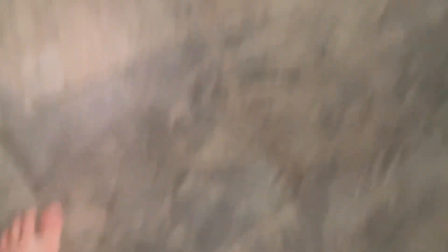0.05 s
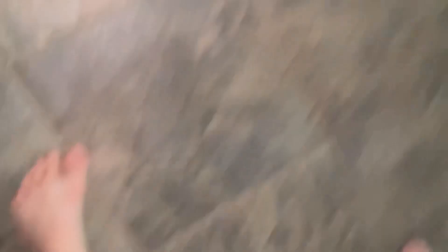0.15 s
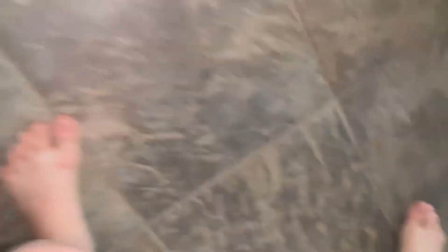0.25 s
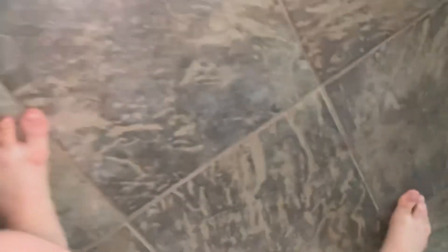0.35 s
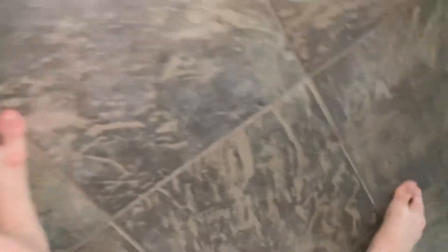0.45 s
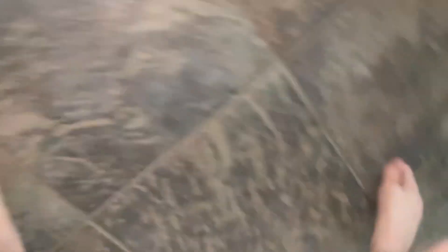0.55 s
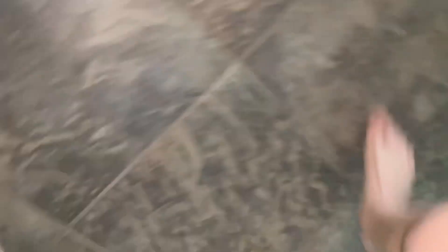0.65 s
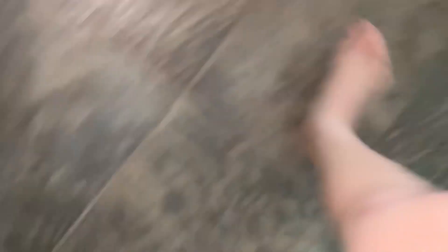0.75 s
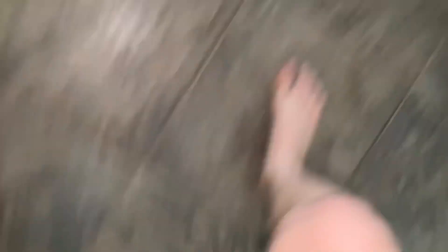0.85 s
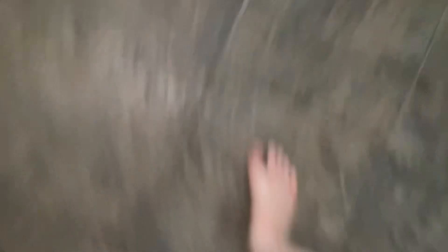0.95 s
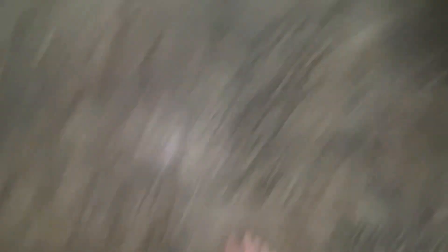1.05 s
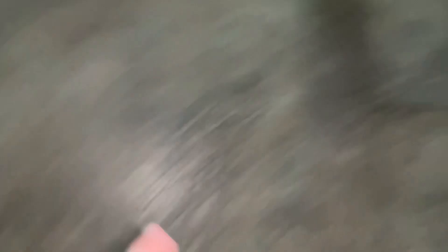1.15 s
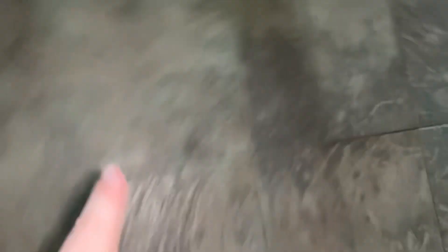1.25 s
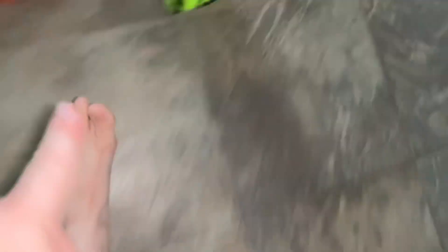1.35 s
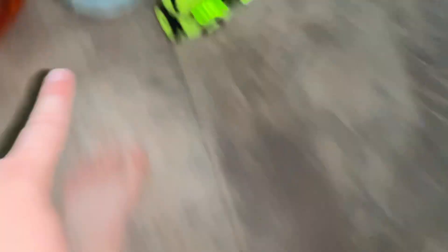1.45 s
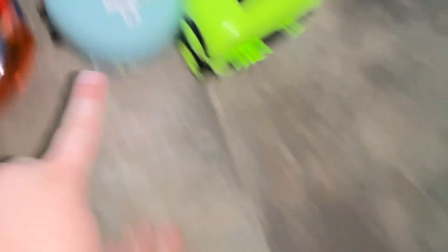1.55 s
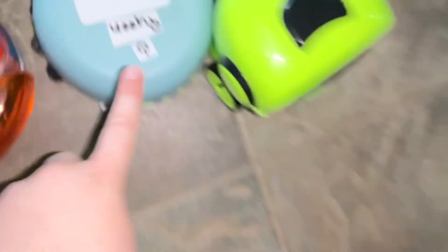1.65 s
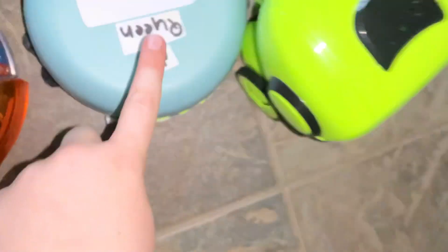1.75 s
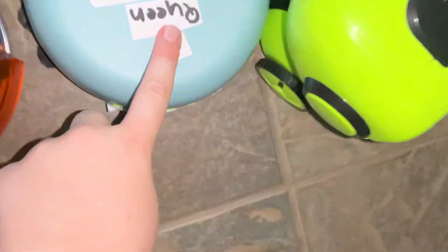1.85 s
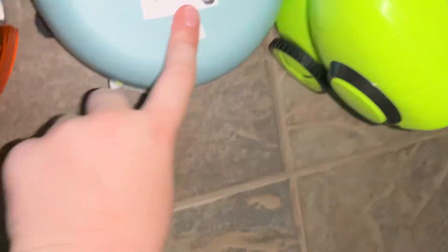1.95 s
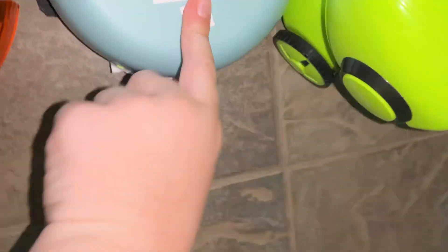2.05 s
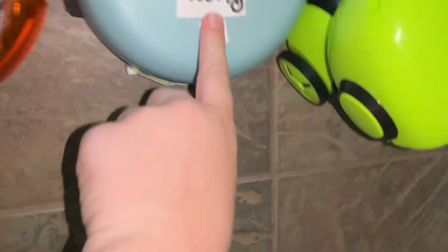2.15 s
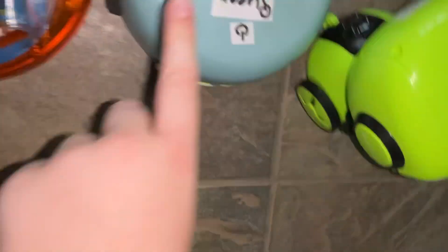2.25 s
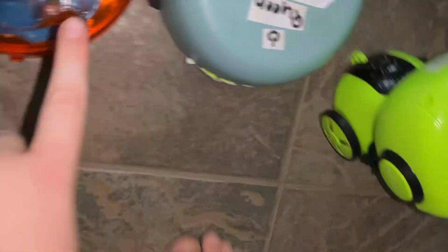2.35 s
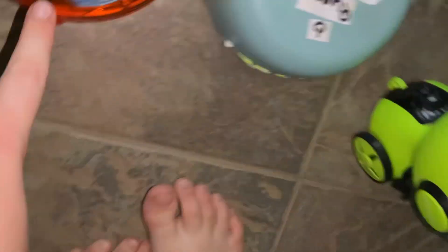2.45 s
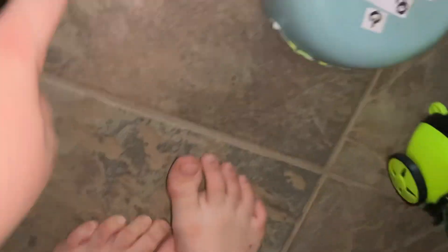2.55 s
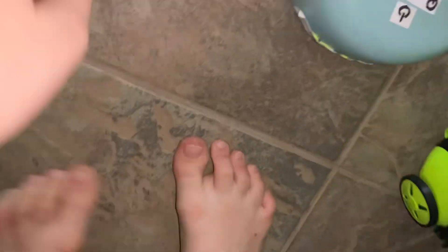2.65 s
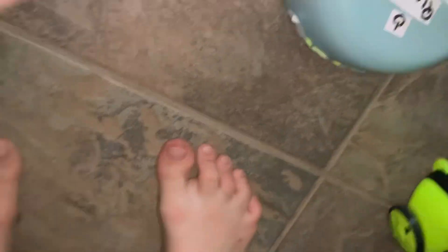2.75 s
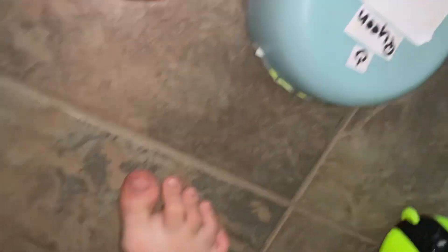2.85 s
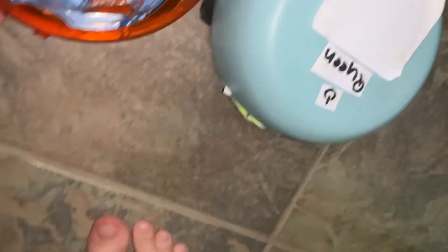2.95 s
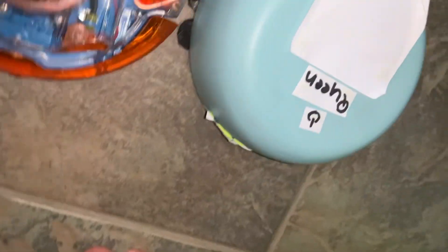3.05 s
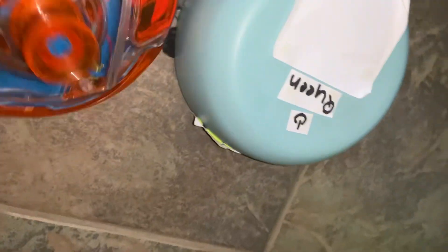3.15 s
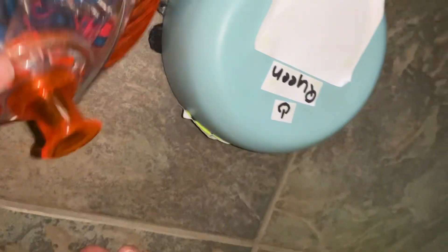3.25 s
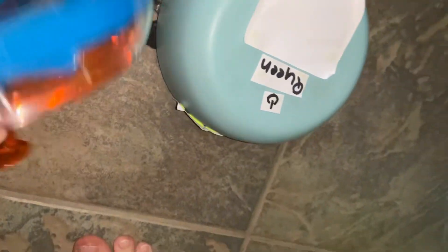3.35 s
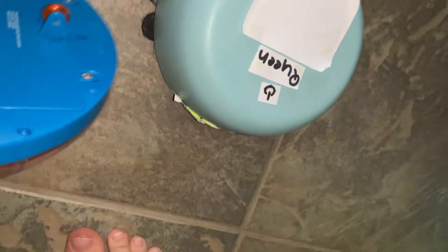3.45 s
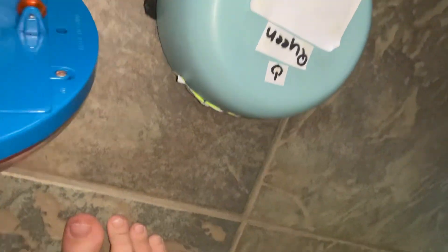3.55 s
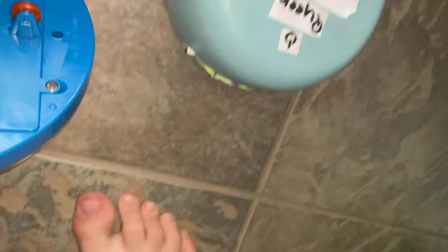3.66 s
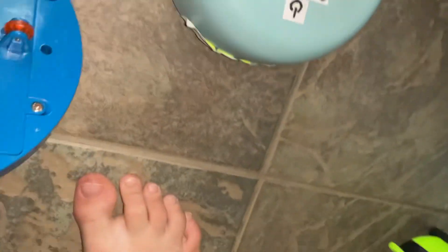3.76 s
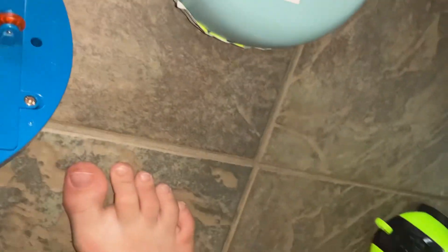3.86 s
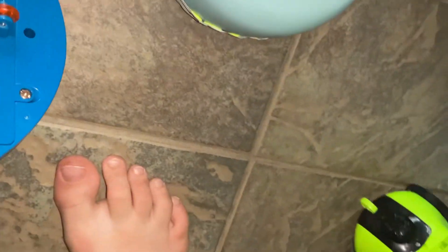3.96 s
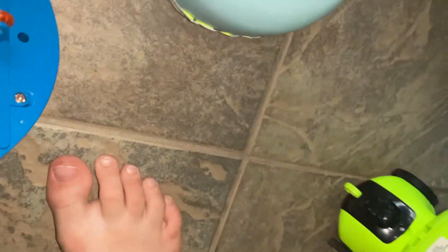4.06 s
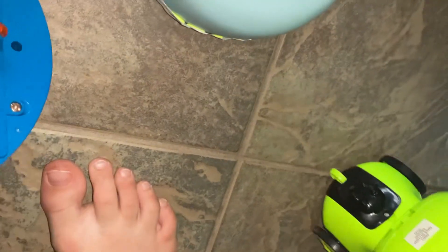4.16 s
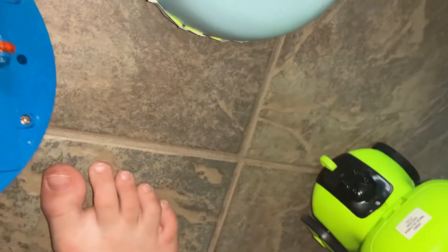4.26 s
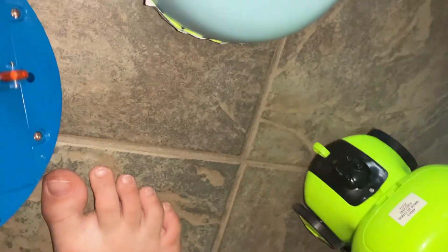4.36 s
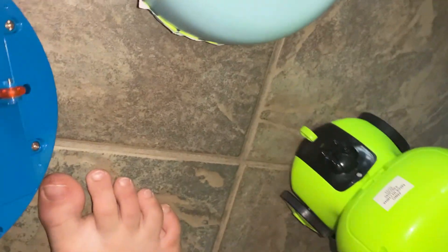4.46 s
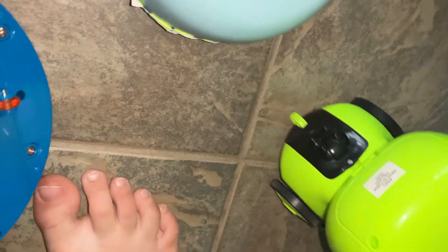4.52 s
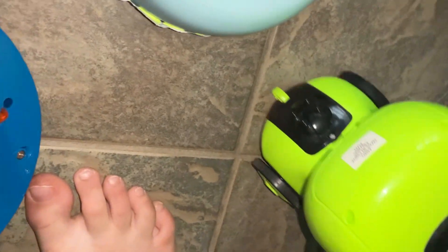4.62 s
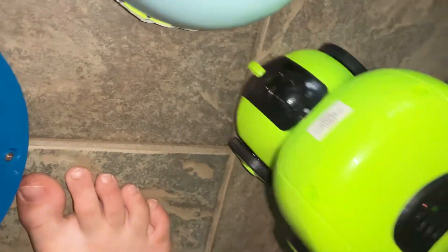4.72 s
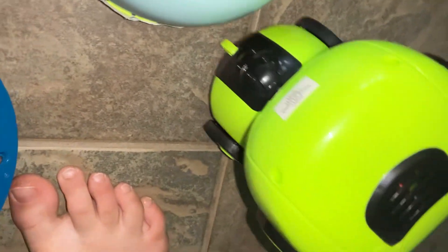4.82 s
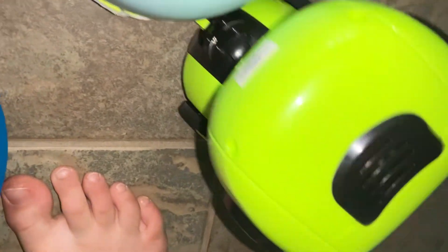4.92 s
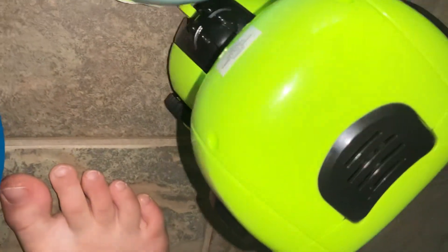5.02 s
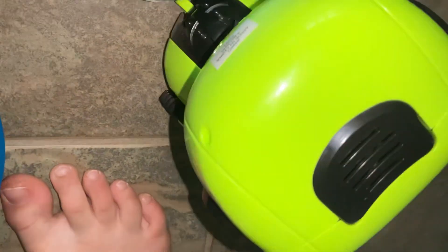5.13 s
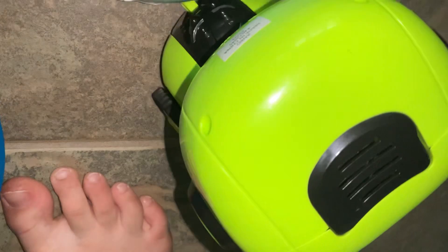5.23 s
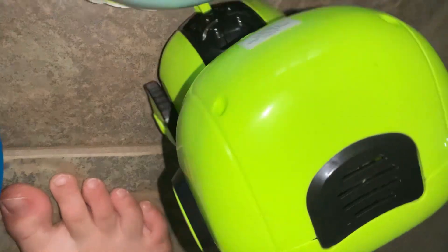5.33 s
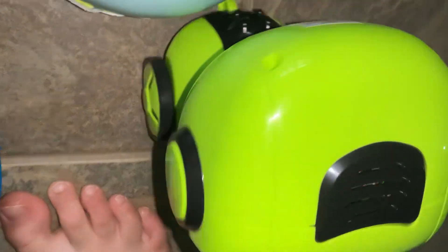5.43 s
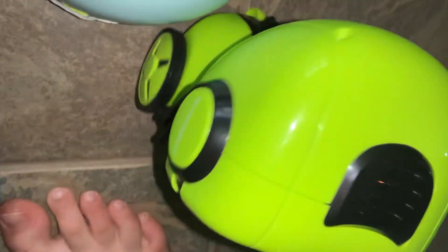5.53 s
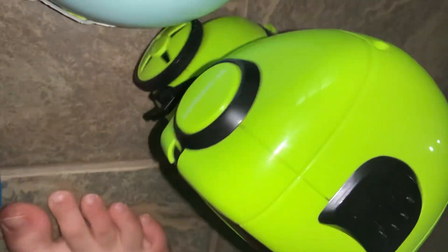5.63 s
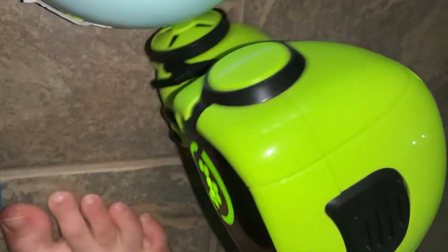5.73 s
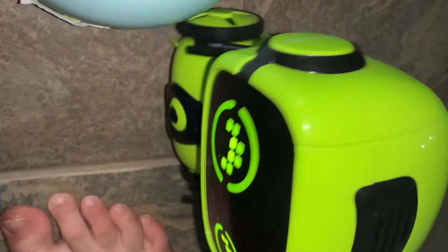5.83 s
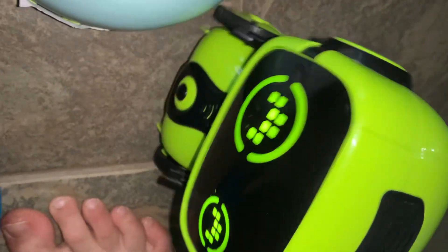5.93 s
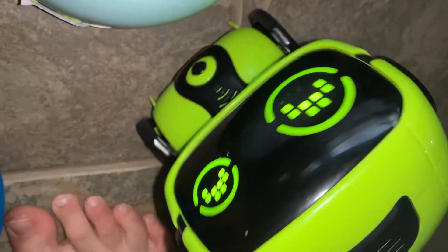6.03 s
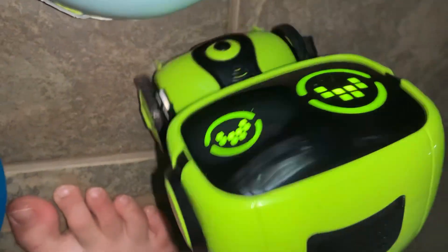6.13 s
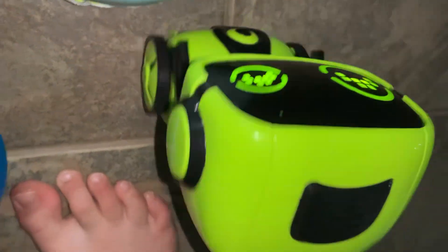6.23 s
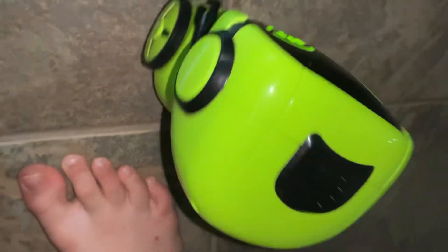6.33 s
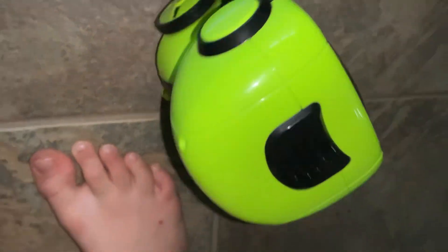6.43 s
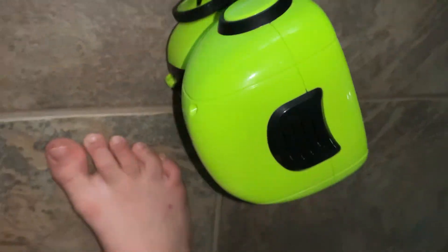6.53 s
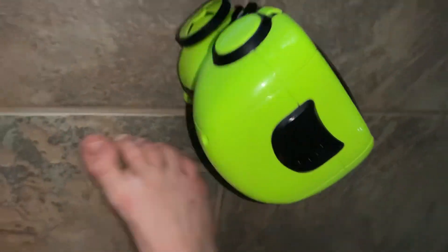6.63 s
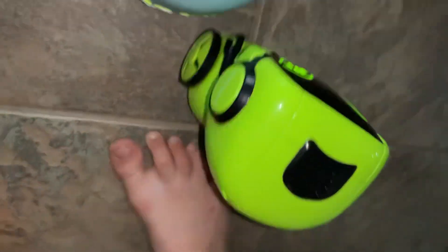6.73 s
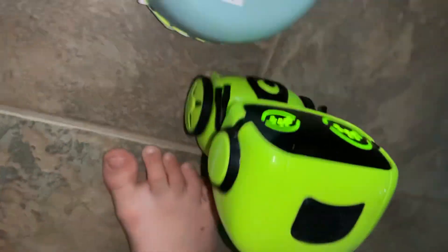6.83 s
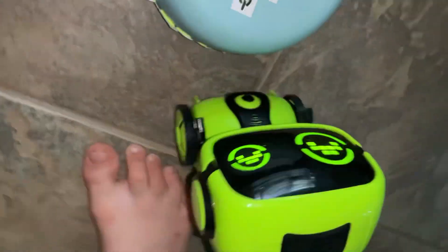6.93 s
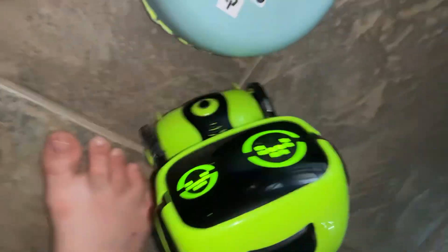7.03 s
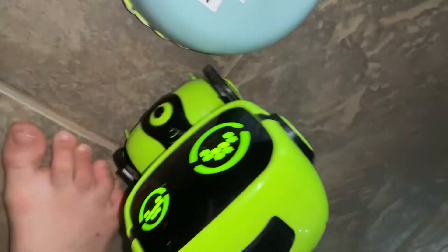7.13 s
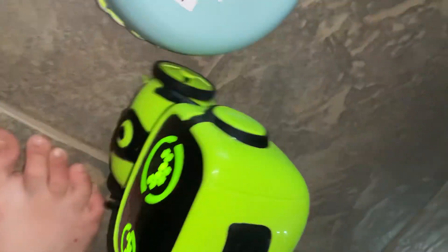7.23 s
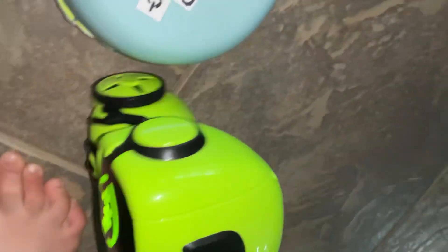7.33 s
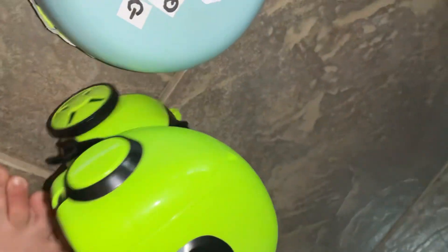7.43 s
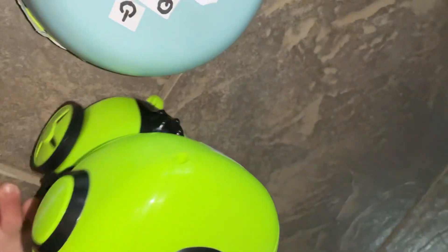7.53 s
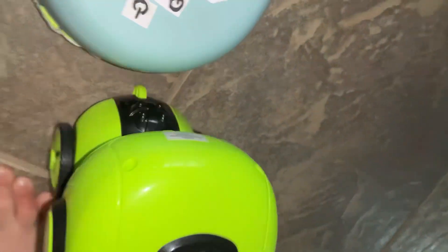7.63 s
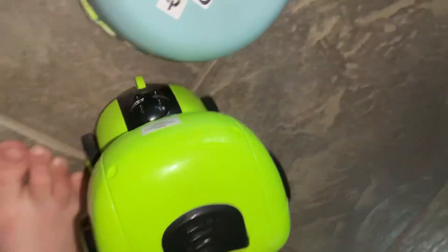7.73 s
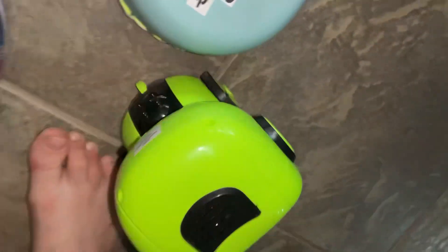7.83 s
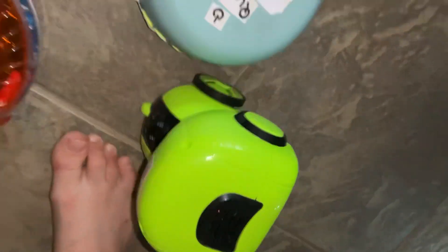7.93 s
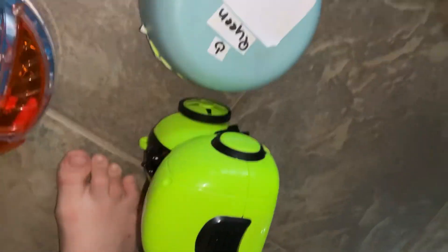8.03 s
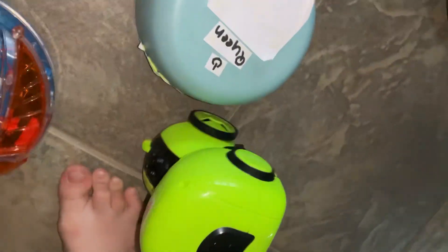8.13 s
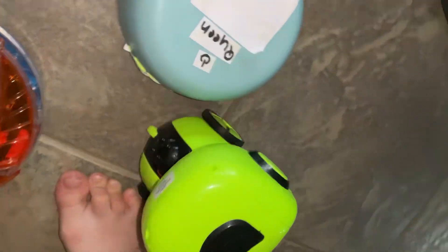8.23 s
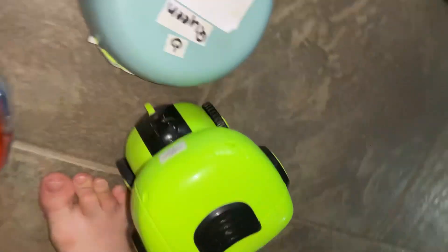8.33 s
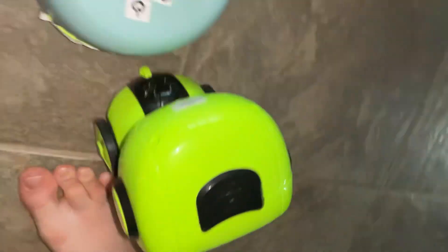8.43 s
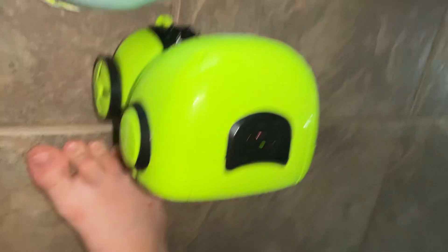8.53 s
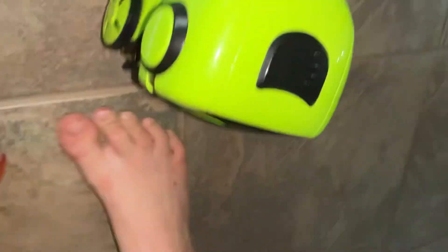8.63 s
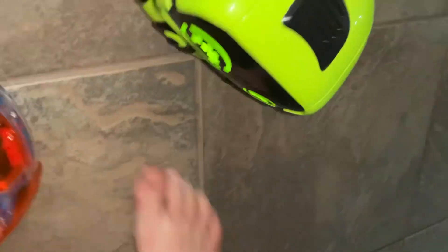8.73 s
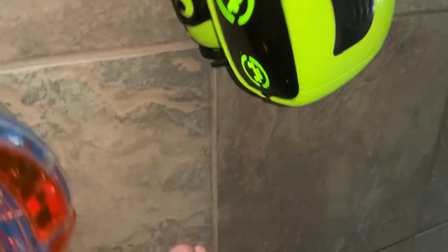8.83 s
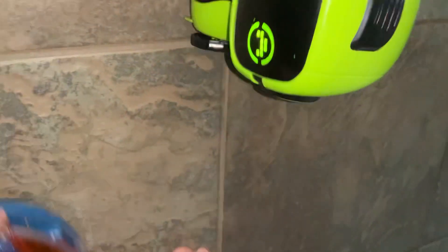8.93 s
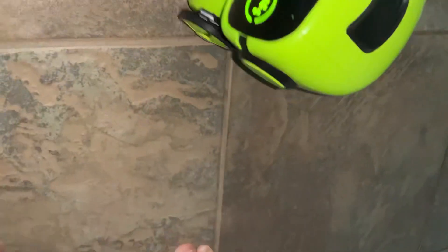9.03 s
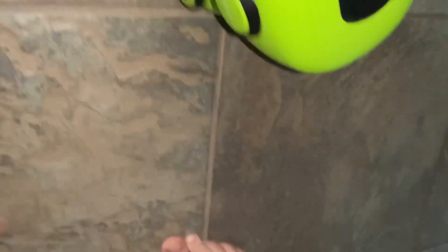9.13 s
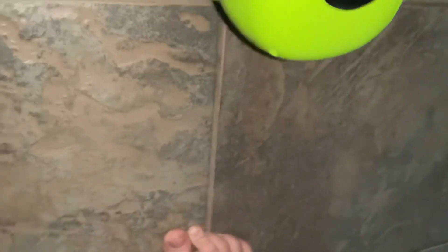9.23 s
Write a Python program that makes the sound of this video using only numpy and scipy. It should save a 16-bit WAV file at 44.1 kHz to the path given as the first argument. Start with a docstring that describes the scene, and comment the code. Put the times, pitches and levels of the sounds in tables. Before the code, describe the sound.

A quiet gear whirr with small plastic clicks and a hollow button thock, then a robot vacuum's suction roars up with a rising whine and chatter.

```python
"""A quiet gear drive whirrs over a low house murmur, with plastic clicks, soft thuds and scuffs, heard from
above. A button thocks on a hollow shell; then a small robot vacuum's suction starts on a tiled floor: rushing
air, ticking foam beads, a buzzing motor, a rising whine and a chattering shell. Rubbing and flow are shaped
noise, blows are decaying noise bands, the lid is a sum of decaying modes, and the whine is a tone with its
octave."""
import sys
import numpy as np
from scipy import signal
from scipy.fft import rfft, irfft
from scipy.io import wavfile
from scipy.ndimage import map_coordinates

SR = 44100
rng = np.random.default_rng(int(sys.argv[2]) if len(sys.argv) > 2 else 0)


def log_audio(samples):
    """Write samples as a 16-bit WAV file to the path given in sys.argv[1]."""
    # one column per channel
    frames = np.atleast_2d(samples).T
    # limit to full scale, then quantise
    limited = np.clip(frames, -1, 1)
    pcm = np.round(limited * 32767).astype(np.int16)
    wavfile.write(sys.argv[1], SR, pcm)


N = 409248
TIME = np.arange(N) / SR


def undb(db):
    """Logarithmic level: decibels to amplitude gain."""
    return 10 ** (np.asarray(db) / 20)


def unit(x):
    """Normalisation: scale to rms 1."""
    return x / np.sqrt(np.mean(x ** 2) + 1e-18)


def curves(table):
    """Linear interpolation: each column of a table as a line through time."""
    s, *columns = np.transpose(table)
    return [np.interp(TIME, s, column) for column in columns]


def noise():
    """White noise: equal power at every frequency."""
    return rng.standard_normal(N)


def colour(x, points):
    """Spectral shaping: weight x by (pitch_hz, level_db) points with steep outer skirts; rms 1."""
    hz, db = np.transpose(points)
    octave = np.log2(np.maximum(np.fft.rfftfreq(N, 1 / SR), 1))
    known = np.log2(hz)
    octaves_outside = np.abs(octave - np.clip(octave, known[0], known[-1]))
    gain = undb(np.interp(octave, known, db) - 59 * octaves_outside)
    return unit(irfft(rfft(x) * gain, N))


def resonance(x, hz, width_hz):
    """Resonance: a single mode with gain 1 at its centre."""
    return signal.lfilter(*signal.iirpeak(hz, hz / width_hz, fs=SR), x)


def walk(rate):
    """Random modulation: smooth chance of spread near 1, drawn anew rate times a second."""
    return 1.2 * np.interp(TIME * rate, np.arange(4096), rng.standard_normal(4096))


def turns(hz):
    """Phase accumulation: the angle in radians of something spinning at hz."""
    return 2 * np.pi * np.cumsum(hz) / SR


def grains(rate, spread_db, ring_s):
    """Random impacts: tiny blows of uneven size, each smeared by a short ring; rms 1."""
    hits = 1. * (rng.random(N) < rate / SR)
    size = np.minimum(rng.exponential(size=N), 4)
    hits[hits > 0] = undb(spread_db * size[hits > 0])
    energy = signal.lfilter([1], [1, -np.exp(-2 / (ring_s * SR))], hits ** 2)
    return unit(np.sqrt(energy) * noise())


def fade(t, t60):
    """Exponential damping: decay by 60 dB in t60 seconds."""
    return np.exp(-np.log(1000) * t / t60)


def add(track, s, sound):
    """Superposition: mix a sound in at time s."""
    i = max(int(s * SR), 0)
    track[i:i + len(sound)] += sound[:N - i]


def since(s):
    """Elapsed time: seconds gone by since s; zero before."""
    return np.maximum(TIME - s, 0)


def ramp(s, length_s):
    """Linear onset: rise evenly from 0 to 1, starting at s."""
    return np.minimum(since(s) / length_s, 1)


def bell(s, spread_s):
    """Gaussian envelope: a smooth rise and fall around time s, 1 at its top."""
    out = np.zeros(N)
    near = np.abs(TIME - s) < 5 * spread_s
    out[near] = np.exp(-.5 * ((TIME[near] - s) / spread_s) ** 2)
    return out


def swells(table):
    """Amplitude envelope: a bell at each (centre_s, spread_s, level_db)."""
    return sum(undb(db) * bell(s, spread) for s, spread, db in table)


def patchy(x, patchy_db, patch_hz, patch_s):
    """Time-frequency modulation: narrow bands swell and fade at random, each on its own."""
    hz, s, cells = signal.stft(x, SR, nperseg=1024)
    chance = rng.standard_normal((400, 800))
    places = np.meshgrid(hz / patch_hz, s / patch_s, indexing="ij")
    gain = undb(patchy_db * unit(map_coordinates(chance, places, order=1, mode="mirror")))
    return signal.istft(cells * unit(gain), SR)[1][:N]


def room(x, wet_db, low_t60=0.49, high_t60=0.46):
    """Reverberation: tiles and walls add a short diffuse tail, duller as it fades."""
    t = np.arange(SR // 2) / SR
    scatter = rng.standard_normal(len(t))
    low = signal.sosfilt(signal.butter(1, 3000, fs=SR, output="sos"), scatter)
    tail = low * fade(t, low_t60) + 0.29 * (scatter - low) * fade(t, high_t60)
    tail = tail * np.minimum(t / 0.0019, 1)
    tail = tail / np.sqrt(np.sum(tail ** 2))
    return x + undb(wet_db) * signal.fftconvolve(x, tail)[:N]


# spectrum of the house murmur: pitch_hz [Hz], level_db [dB, relative]
HOUSE_SPECTRUM = [(25, -32), (40, -17), (55, -9), (70, -1.5), (100, 1.5), (125, -5.5), (200, -11.5),
                  (500, -3.5), (2000, -39), (16000, -32)]


def house_murmur():
    """Broadband background: low shaped noise whose level wanders slowly."""
    return colour(noise(), HOUSE_SPECTRUM) * undb(-52.5 + 2 * walk(4.5))


# quiet gear drive, louder as it comes near: time_s [s], whirr_db [dB], scratch_db [dB], before the fainter moments
DRIVE_LEVELS = [(0.0, -44, -52.5), (0.8, -46.5, -48), (1.5, -40, -46.5), (1.8, -35, -41.5), (2.2, -37, -49),
                (2.8, -37.5, -45.5), (3.4, -43, -48.5), (4.1, -38, -46), (4.8, -34.5, -39.5),
                (5.25, -34.5, -46), (5.5, -33, -40)]
# spectrum of the gear teeth in their housing: pitch_hz [Hz], level_db [dB, relative]
GEAR_SPECTRUM = [(590, -70), (1000, 4), (1830, -4.5), (2780, 5.5), (4170, -8.5), (4840, -3.5), (5830, -9),
                 (7700, -9.5), (9490, -17.5), (14600, -22), (16000, -26)]
# spectrum of the rolling wheels: pitch_hz [Hz], level_db [dB, relative]
ROLL_SPECTRUM = [(76, -43), (130, -12.5), (264, -4), (399, 1.5), (525, -8), (582, -4.5), (715, -1),
                 (848, -5.5), (1040, -6), (1830, -11.5), (2000, -4.5), (2600, -34), (4400, -120)]
# moments when the whirr is heard more faintly: centre_s [s], spread_s [s], depth_db [dB]
FAINTER_MOMENTS = [(0.032, .06, 2), (2.09, .06, 6.5), (3.456, 0.035, 2.5), (5.105, 0.039, 8.5)]
DRIVE_USUAL_DB = -36
ROLL_DB, ROLL_FOLLOW = -40.5, 0.64  # rolling when the whirr is at DRIVE_USUAL_DB; dB per dB of whirr


def drive(mesh_hz=68, mesh_depth=0.23):
    """Gear-mesh modulation: teeth scratch in a ringing housing while wheels roll over the tiles."""
    whirr_db, scratch_db = curves(DRIVE_LEVELS)
    roll_db = ROLL_DB + ROLL_FOLLOW * (whirr_db - DRIVE_USUAL_DB)
    fainter_db = sum(depth * bell(s, spread) for s, spread, depth in FAINTER_MOMENTS)

    mesh = 1 + mesh_depth * np.cos(turns(mesh_hz * (1 + 0.1443 * walk(5.7))))
    ticks = grains(350, 2.8, .002)
    teeth = colour(mesh * (noise() + 0.77 * ticks), GEAR_SPECTRUM)
    scratch = signal.sosfilt(signal.butter(3, 6000, "high", fs=SR, output="sos"), teeth)
    whirr = signal.sosfilt(signal.butter(3, 5600, "low", fs=SR, output="sos"), teeth)

    # the housing's resonances come and go as the contact shifts
    pings = unit(resonance(grains(45, 3, .004), 2830, 200))
    whirr = unit(whirr + 0.6 * undb(5 * walk(6)) * resonance(whirr, 4100, 300))
    whirr = whirr + undb(-7 + 2.8 * walk(5)) * pings
    whirr = whirr * undb(1.2 * walk(22))
    scratch = scratch + 0.42 * undb(5.2 * walk(4)) * resonance(scratch, 8460, 600)

    bumps = grains(140, 2.6, .006)
    roll = colour(noise() + 1.4 * bumps, ROLL_SPECTRUM)
    roll = roll + 0.3 * resonance(roll, 450, 160)
    roll = unit(roll) * undb(1.5 * walk(11))

    sound = unit(whirr) * undb(whirr_db) + unit(scratch) * undb(scratch_db) + roll * undb(roll_db)
    return sound * undb(-fainter_db) * (1 - ramp(5.39, 0.24))


# plastic clicks and bumps: start_s [s], level_db [dB before the shell's resonances],
# hardness_db [dB of tilt per band], hollowness_db [dB taken off the outer bands]
KNOCKS = [(0.116, -42.5, 5, -5), (0.199, -29.5, -2, 2), (0.406, -34, -4, 1.5), (0.437, -33, 0, -2),
          (0.453, -28.5, 3.5, -8), (0.466, -27, -1, -2.5), (0.494, -35.5, 4.5, -11),
          (0.525, -38, 2.5, -7.5), (0.767, -40, 8, 22), (1.252, -37, 4.5, 7), (1.571, -30, 0.5, 3),
          (2.472, -41, 2.5, -1.5), (2.589, -41.5, 3.5, -1.5), (2.84, -41, 11, 8.5), (2.917, -29, 1, 7),
          (3.033, -34.5, -1, 17), (3.062, -32, 5, 15), (3.126, -18.5, 3.5, 13.5), (3.182, -22.5, 6.5, 15),
          (3.196, -32.5, 4, 8), (3.502, -24, 8, 6), (3.516, -24.5, 1.5, 9), (3.717, -36.5, 6, 21),
          (3.774, -24.5, 0, 6), (3.945, -35, 4, 11), (4.197, -32, 4, 1.5), (4.214, -28.5, 6, 12),
          (4.254, -32, 5.5, 8.5), (4.283, -34.5, 5.5, 8), (4.381, -38, 9, 16), (4.476, -37, 11.5, 17),
          (4.681, -37, 10, 11), (4.76, -26, 5.5, 5.5), (4.948, -23.5, 1, 5), (4.962, -37.5, 3, 5),
          (5.361, -33.5, 4.5, 9), (5.838, -24.5, 4, 2), (6.158, -22.5, 6.5, 6), (7.39, -24.5, 7, 1.5),
          (7.438, -25, 1, 9), (7.46, -29, 10, 4.5), (8.78, -21.5, 8.5, 10.5), (8.951, -26.5, 11, 6.5),
          (9.09, -27, -1, 11)]
# bands in which the plastic rings: low_hz [Hz], high_hz [Hz]
KNOCK_BANDS = [(140, 450), (560, 1500), (1500, 4800), (5000, 16000)]
KNOCK_RING_S = 0.033  # t60 of the plastic, before each band's own factor


def knocks(snap_s=0.0052, rattle_db=-8, rise_s=0.00079, dull_hz=6500):
    """Impact excitation: each blow snaps, then the plastic rings densely; the treble dies first."""
    out, t = np.zeros(N), np.arange(SR // 8) / SR
    attack = t < .012
    filters = [signal.butter(4, band, "band", fs=SR, output="sos") for band in KNOCK_BANDS]
    soften = signal.butter(1, dull_hz, fs=SR, output="sos")
    height, outer = np.array([-1.5, -.5, .5, 1.5]), np.array([1, 0, 0, 1])
    decay_factors = (2.8, 1.46, 1.5, 0.91)
    for s, level_db, hardness_db, hollow_db in KNOCKS:
        levels_db = level_db + hardness_db * height - hollow_db * outer
        for band, db, longer in zip(filters, levels_db, decay_factors):
            push = fade(t, snap_s * longer) + undb(rattle_db) * fade(t, KNOCK_RING_S * longer)
            push = push * (1 - np.exp(-t / rise_s))
            ring = signal.sosfilt(np.vstack([band, soften]), rng.standard_normal(len(t)) * push)
            add(out, s, undb(db) * ring / np.sqrt(np.mean(ring[attack] ** 2)))
    # the shells favour a hollow note and a clack
    hollow = 0.98 * resonance(out, 754, 130)
    clack = 0.3 * resonance(out, 2600, 250) + .5 * resonance(out, 2080, 380)
    return 0.82 * out + hollow + clack


# soft thuds through the floor: centre_s [s], spread_s [s], level_db [dB]
SOFT_THUDS = [(0.48, .035, -42), (1.48, 0.051, -46), (1.87, .03, -45), (2.5, 0.029, -54),
              (3.52, 0.017, -50), (4.19, 0.059, -50), (5.2, 0.13, -49), (6.93, .04, -50), (7.94, .04, -48)]


def soft_thuds():
    """Soft impact: thuds through the floor carry only bass, so each is a swell of low noise."""
    thud = colour(noise(), [(35, -23), (55, -9), (70, 0), (95, 1), (130, -7)])
    return swells(SOFT_THUDS) * thud


# plastic sliding on plastic: centre_s [s], spread_s [s], level_db [dB]
SLIDES = [(1.59, 0.014, -35.5), (2.923, 0.015, -33.5), (3.252, 0.022, -38), (3.294, 0.015, -25.5),
          (4.786, 0.029, -37), (5.017, 0.02, -35.5)]


def slides():
    """Sliding friction: a rush of tiny impacts makes brief scuffs that swell and stop."""
    spectrum = [(500, -14), (800, 3.5), (3000, 1.5), (5000, 1), (8000, 2.5), (11000, -10), (16000, -14)]
    return swells(SLIDES) * colour(grains(1500, 0.97, 0.0013), spectrum)


# modes of the hollow lid under the button: pitch_hz [Hz], level_db [dB, relative], t60_s [s]
LID_MODES = [(290, -19, 0.052), (496, -5, 0.043), (592, -5.5, 0.058), (659, -12.5, 0.1), (790, -2.5, 0.028),
             (935, -5.5, 0.06), (1147, -12, 0.046), (1770, -7, 0.027), (2830, -11, 0.011)]
BUTTON_S, BUTTON_DB = 1.970, -2.5


def button(click_db=-11, low_hz=260):
    """Modal synthesis: a finger snaps the switch down and the lid rings, with no bass beneath it."""
    out, t = np.zeros(N), np.arange(SR // 3) / SR
    lid = np.zeros(len(t))
    for k, (hz, db, t60) in enumerate(LID_MODES):
        lid += (-1) ** k * undb(db) * np.sin(2 * np.pi * hz * t) * fade(t, t60)
    click = signal.lfilter([.4], [1, -.6], rng.standard_normal(len(t))) * fade(t, 0.01)
    add(out, BUTTON_S, undb(BUTTON_DB) * (lid + undb(click_db) * click))
    return signal.sosfilt(signal.butter(2, low_hz, "high", fs=SR, output="sos"), out)


# the suction running: time_s [s], air_db [dB], hiss_db [dB, beads and hiss]
SUCTION_LEVELS = [(5.55, -22.5, -24), (5.85, -20, -20), (6.3, -19.5, -20.5), (6.6, -26.5, -18.5),
                  (7.1, -22.5, -22.5), (7.6, -21.5, -25.5), (8.5, -23, -26), (8.95, -19.5, -24),
                  (9.28, -24.5, -27)]
# spectra of the rushing air, the hiss and the hollow body: pitch_hz [Hz], level_db [dB, relative]
AIR_SPECTRUM = [(900, -42), (1300, -3), (1650, 3.5), (2100, 0.5), (2420, 3.5), (2800, 2.5), (3050, -7),
                (3350, 2.5), (3900, -2.5), (4150, -1), (5300, -8), (7000, -12)]
HISS_SPECTRUM = [(3000, 6.5), (5200, -0.5), (6300, 3.5), (6950, 0.5), (8200, 8), (9600, 1.5), (10600, 3.5),
                 (12100, -2), (12900, 2.5), (14000, -4), (15000, 4.5), (16000, -15)]
BODY_SPECTRUM = [(430, -30), (560, -6), (660, 3), (820, 2.5), (1000, 1), (1200, 0), (1700, -13)]
SUCTION_S, SUCTION_ATTACK_S = 5.39, 0.17  # switched on; time for the air to build up
MOTOR_HZ, GEAR_HZ = 215, 93.1  # turns per second at full speed
MOTOR_SLOW_SHARE, MOTOR_RUN_UP_S = 0.28, 0.45  # how far below full speed it starts; time constant
BODY_DB, SCRAPE_BODY_DB = -8.5, -8  # hollow body: relative to the air, and to a scrape of the shell


def suction(motor_depth=0.15, gear_depth=0.15, beads_db=-4):
    """Amplitude-modulated turbulence: air and beads are chopped once per turn of the motor and of its gear."""
    air_db, hiss_db = curves(SUCTION_LEVELS)
    speed = 1 - MOTOR_SLOW_SHARE * np.exp(-since(SUCTION_S) / MOTOR_RUN_UP_S)
    speed = speed * (1 + .004 * walk(12))
    motor = motor_depth * np.cos(turns(MOTOR_HZ * speed))
    gear = gear_depth * np.cos(turns(GEAR_HZ * speed))
    chop = 1 + motor + gear

    coarse_beads = undb(beads_db) * grains(900, 4.0, 0.0014)
    air = colour(chop * (noise() + coarse_beads), AIR_SPECTRUM) * undb(air_db + 0.55 * walk(25))
    fine_beads = undb(beads_db) * grains(1000, 4.5, .001)
    hiss = colour(chop * (noise() + fine_beads), HISS_SPECTRUM) * undb(hiss_db + 0.96 * walk(40))

    body_level = undb(air_db + BODY_DB) + undb(SCRAPE_BODY_DB) * swells(CHATTER)
    body = colour(chop * noise(), BODY_SPECTRUM) * body_level * undb(1.35 * walk(18))
    flow = ramp(SUCTION_S, SUCTION_ATTACK_S)
    return (air + body) * flow + hiss * flow ** 2  # the hiss needs fast air, so it comes last


# spectrum of the wheels' rumble: pitch_hz [Hz], level_db [dB, relative]
WHEEL_SPECTRUM = [(80, -5.5), (140, -10.5), (200, -9.5), (290, 1), (370, 3), (460, 1.5), (650, -15.5)]
# the wheels judder on the tiles: centre_s [s], spread_s [s], level_db [dB]
JUDDERS = [(5.585, 0.0067, -26), (5.84, 0.025, -35), (5.9, 0.013, -36), (6.0, 0.0074, -27.5),
           (6.11, 0.016, -29), (6.315, 0.02, -34)]
WHEELS_START_DB, WHEELS_DB, WHEELS_SETTLE_S = -33.5, -42.5, 0.95  # they rumble hardest as they set off


def wheel_rumble():
    """Rolling contact: a train of small impacts settles in level and surges when the wheels judder."""
    settling = np.exp(-since(SUCTION_S) / WHEELS_SETTLE_S)
    wheels_db = WHEELS_DB + (WHEELS_START_DB - WHEELS_DB) * settling
    rumble = colour(grains(300, 1, 0.0055), WHEEL_SPECTRUM)
    return rumble * (undb(wheels_db) + swells(JUDDERS)) * ramp(SUCTION_S, SUCTION_ATTACK_S)


FAN_START_S, FAN_FREE_HZ, FAN_SPIN_UP_S = 5.573, 854.4, 0.512  # the fan spins up towards its free speed
FAN_LOAD_S, FAN_LOADED_HZ, FAN_SETTLE_S = 7.49, 798.4, 0.38  # then sags under load
FAN_EASE_S, FAN_EASE_HZ, FAN_EASE_TIME_S = 8.89, 10.2, 0.1  # and gains FAN_EASE_HZ as the load eases


def fan_hz():
    """Exponential speed response: the fan spins up, sags under load and picks up a little at the end."""
    spin_s = np.minimum(since(FAN_START_S), FAN_LOAD_S - FAN_START_S)
    free = FAN_FREE_HZ * (1 - np.exp(-spin_s / FAN_SPIN_UP_S))
    load = 1 - np.exp(-since(FAN_LOAD_S) / FAN_SETTLE_S)
    return free + load * (FAN_LOADED_HZ - free) + FAN_EASE_HZ * ramp(FAN_EASE_S, FAN_EASE_TIME_S)


# modes of the housing near its outlet: pitch_hz [Hz], width_hz [Hz], level_db [dB, relative]
OUTLET_MODES = [(1937, 270, 0.5), (2370, 85, 0.5), (3434, 150, -1), (3817, 120, 5.5)]
OUTLET_DB, OUTLET_RISE_S = -29.5, 0.68  # the housing's ring, and the build-up of ring and jet
JET_ORDER, JET_DB = 16, -13  # the exhaust hiss centres on this multiple of the fan's pitch; dB re the hiss


def outlet(jet_spread_hz=550):
    """Flow-excited resonance: exhaust air rings the housing and hisses through a slot, brighter with fan speed."""
    ring = np.zeros(N)
    for hz, width_hz, db in OUTLET_MODES:
        mode = resonance(resonance(noise(), hz, width_hz), hz, width_hz)
        ring += undb(db + 2.5 * walk(7)) * mode
    _, hiss_db = curves(SUCTION_LEVELS)
    # slow noise times a sine gives a band of noise around the sine
    flutter = unit(signal.sosfilt(signal.butter(2, jet_spread_hz, fs=SR, output="sos"), noise()))
    jet = np.sqrt(2) * flutter * np.sin(turns(JET_ORDER * fan_hz()))
    jet = jet * undb(hiss_db + JET_DB + 2 * walk(20))
    return (unit(ring) * undb(OUTLET_DB) + jet) * ramp(FAN_START_S, OUTLET_RISE_S)


# the whine's tones swell and fade as the machine turns: time_s [s], fundamental_db [dB], octave_db [dB]
WHINE_LEVELS = [(5.8, -55, -52), (6.15, -41, -45), (6.35, -33.5, -42), (6.65, -29, -30), (6.9, -26.5, -69),
                (7.1, -25, -37), (7.35, -22.5, -26.5), (7.8, -33.5, -24.5), (8.3, -35.5, -27.5),
                (8.9, -35, -27.5), (9.28, -33.5, -37)]


def whine(waver=0.0033, flutter_db=1.43):
    """Harmonic radiation: the fan's tone and its octave climb with its speed and flutter as the machine turns."""
    phase = turns(fan_hz() * (1 + waver * walk(40)))
    tones = np.zeros(N)
    for harmonic, db in enumerate(curves(WHINE_LEVELS), 1):
        tones += undb(db + flutter_db * walk(13)) * np.sin(harmonic * phase)
    return np.sqrt(2) * tones * ramp(FAN_START_S, FAN_SPIN_UP_S)


# the shell chatters as the machine scrapes along: centre_s [s], spread_s [s], level_db [dB]
CHATTER = [(6.08, 0.049, -52), (7.42, 0.043, -22), (8.85, 0.024, -21.5), (8.93, .035, -21.5),
           (9.06, 0.041, -26.5)]


def chatter(open_share=0.23):
    """Stick-slip friction: the shell catches on the floor and each slip rings it briefly."""
    cycle = turns(32 * undb(2.5 * walk(30))) / (2 * np.pi) % 1
    slips = noise() * np.exp(-cycle / open_share) * undb(2 * walk(50))
    shell = resonance(slips, 630, 140) + 2.0 * resonance(slips, 1730, 240) + .5 * resonance(slips, 1770, 600)
    return unit(shell) * swells(CHATTER)


def scene():
    """Superposition: knocks and machines sum over the low murmur of the house."""
    house = house_murmur() + soft_thuds()
    gear_drive = patchy(drive(), patchy_db=1.9, patch_hz=259, patch_s=0.08)
    blows = room(knocks() + slides(), wet_db=-11.5) + room(button(), wet_db=-18, low_t60=0.95)
    rush = patchy(suction() + wheel_rumble() + outlet(), patchy_db=1.67, patch_hz=199.9, patch_s=0.09)
    vacuum = rush + whine() + chatter()
    return (house + gear_drive + blows + vacuum)[None]


TOP_HZ = 15900


def record(dry):
    """Hard clipping and band limiting: the microphone overloads on the highest peaks and the top is cut."""
    clipped = np.clip(dry, -.85, .85)
    return signal.sosfilt(signal.ellip(10, .2, 70, TOP_HZ, fs=SR, output="sos"), clipped)


dry = scene()
out = record(dry)
log_audio(out)
```